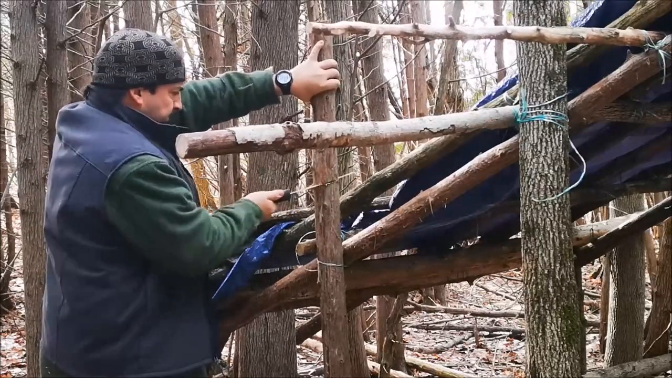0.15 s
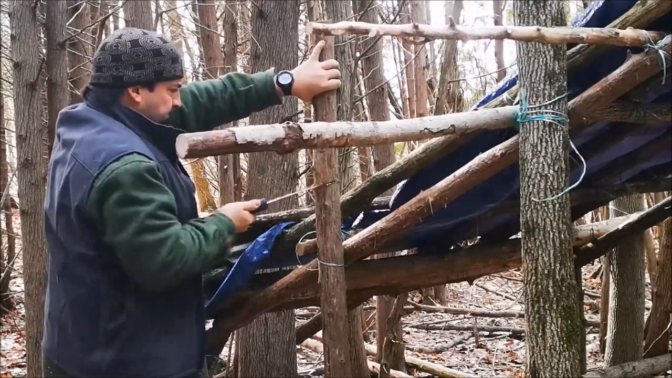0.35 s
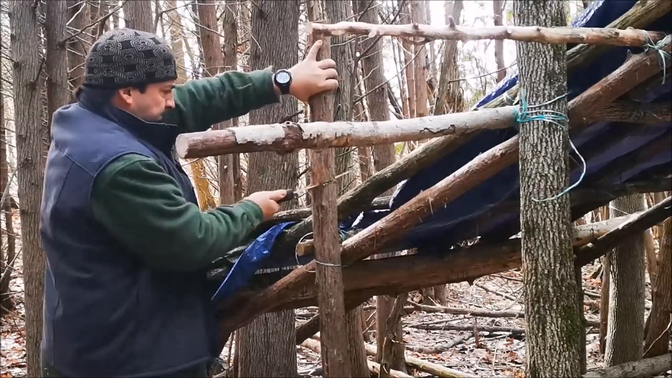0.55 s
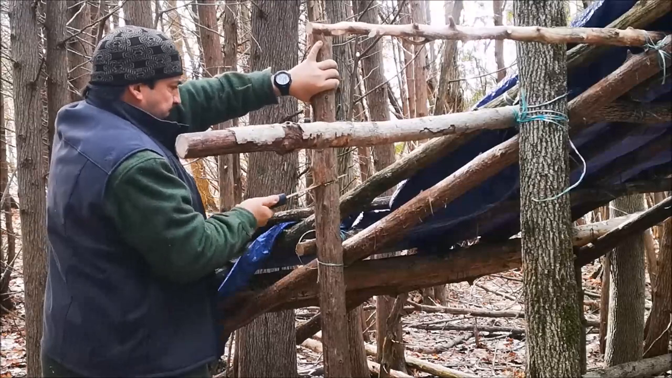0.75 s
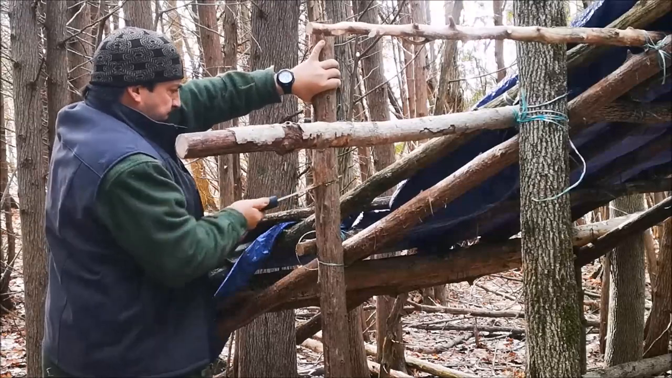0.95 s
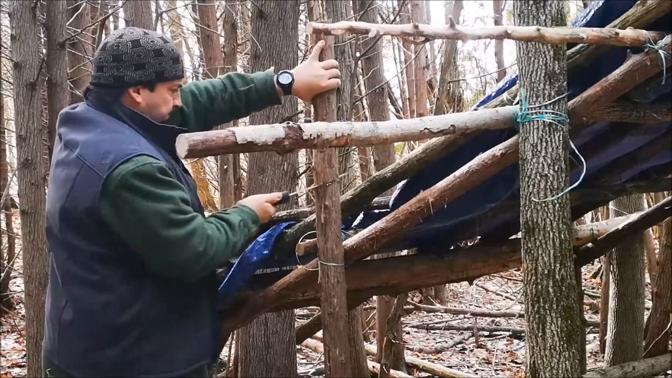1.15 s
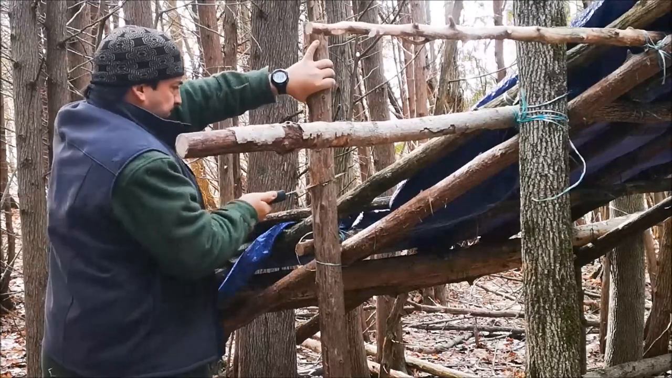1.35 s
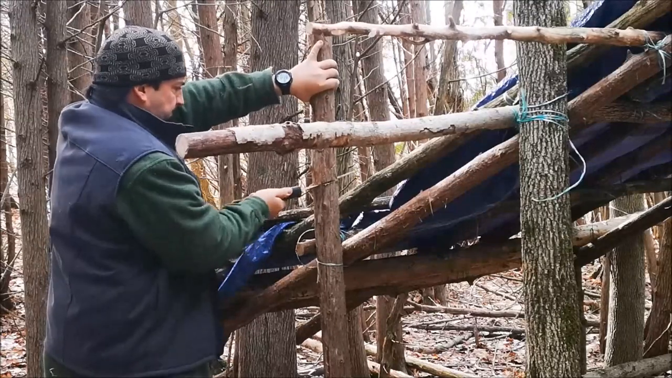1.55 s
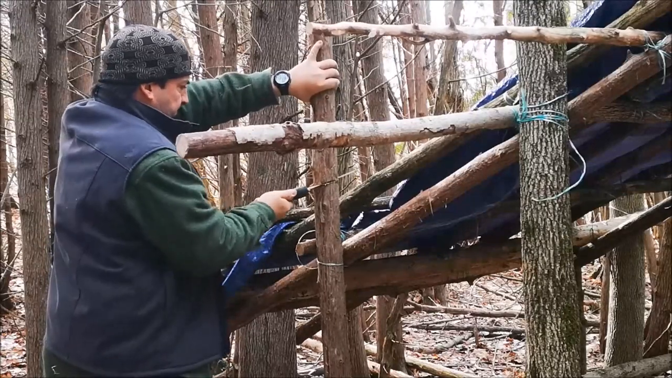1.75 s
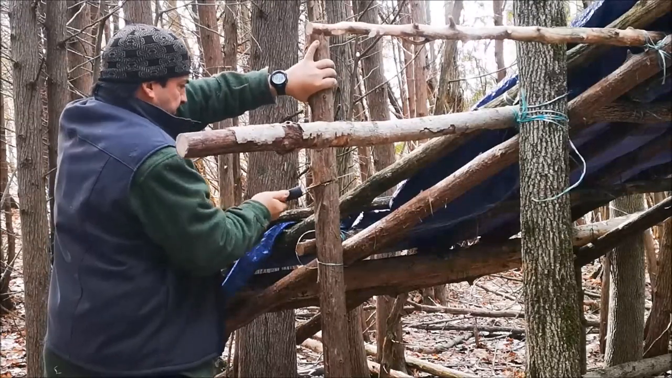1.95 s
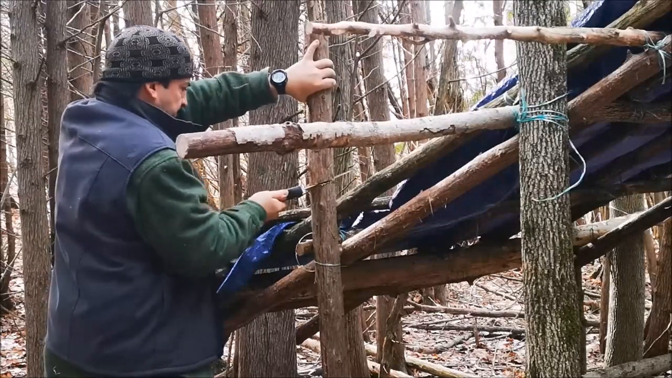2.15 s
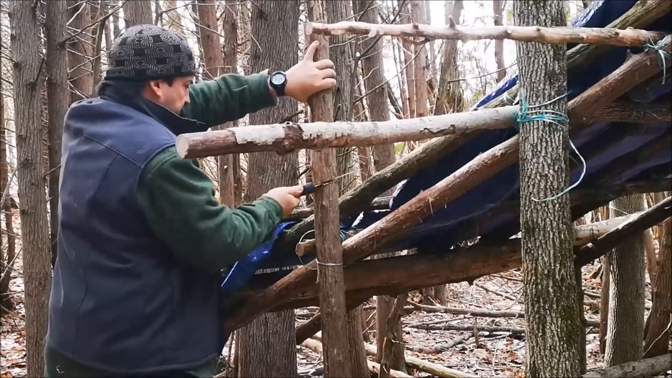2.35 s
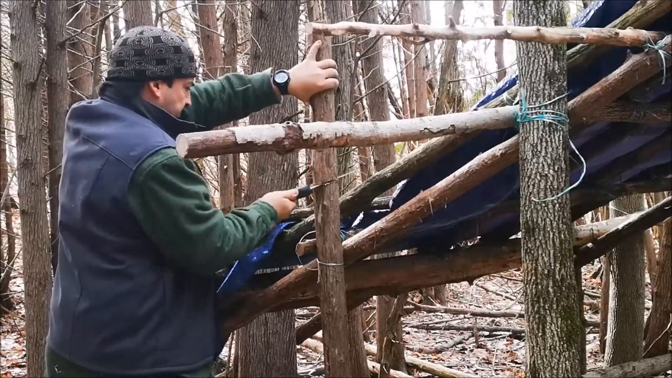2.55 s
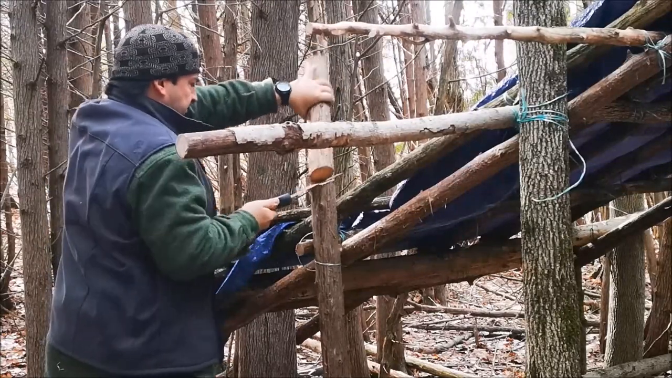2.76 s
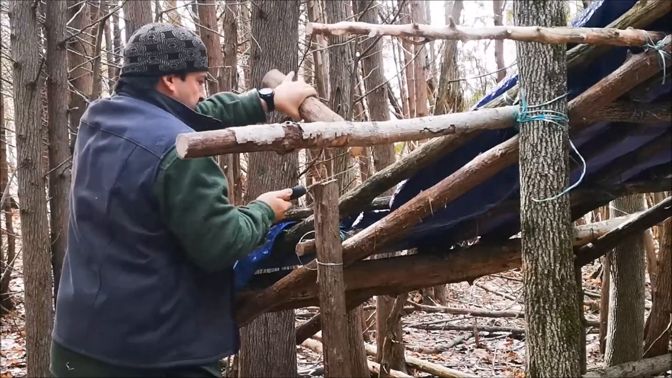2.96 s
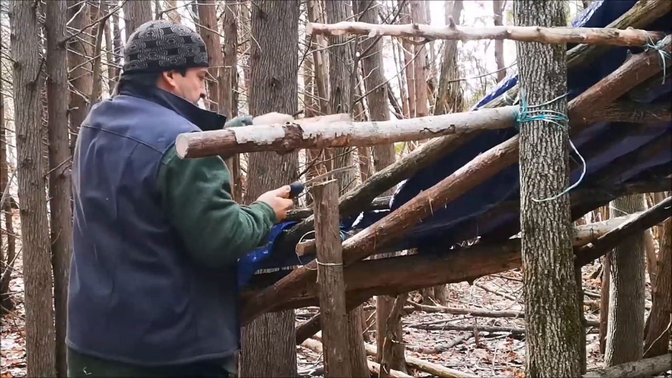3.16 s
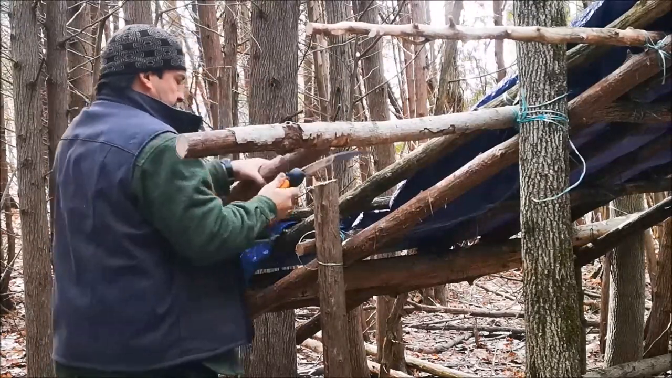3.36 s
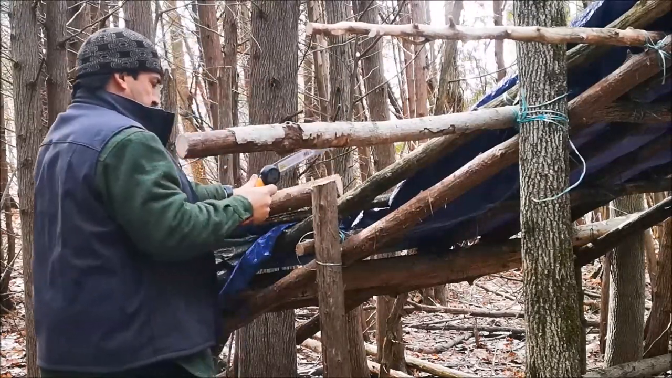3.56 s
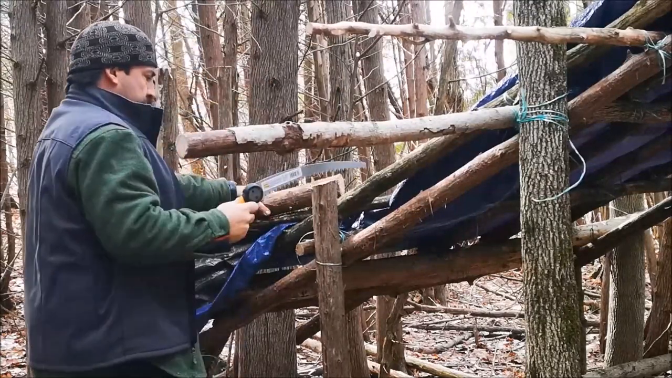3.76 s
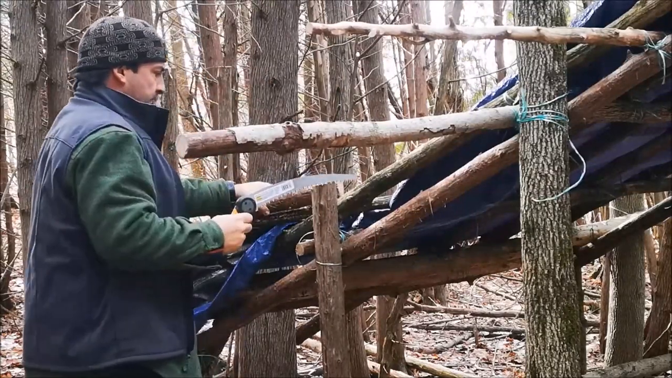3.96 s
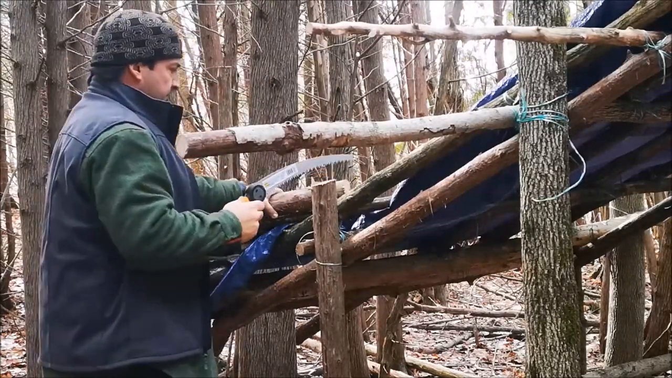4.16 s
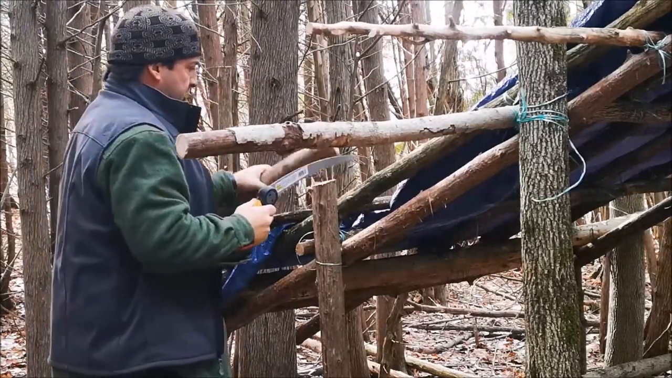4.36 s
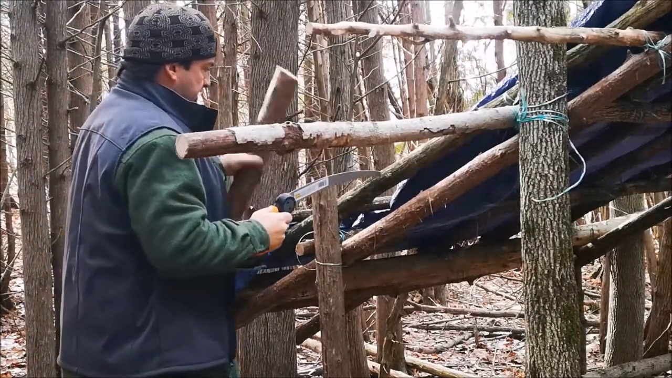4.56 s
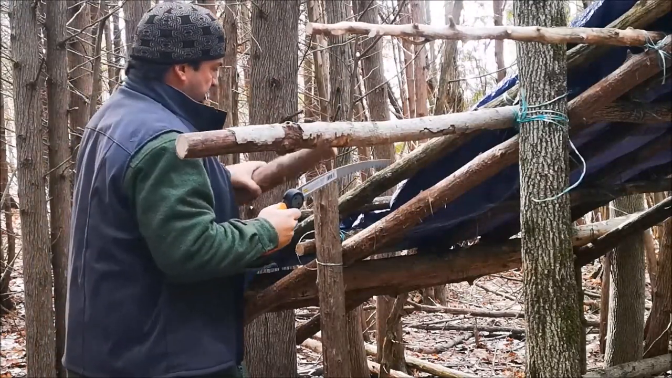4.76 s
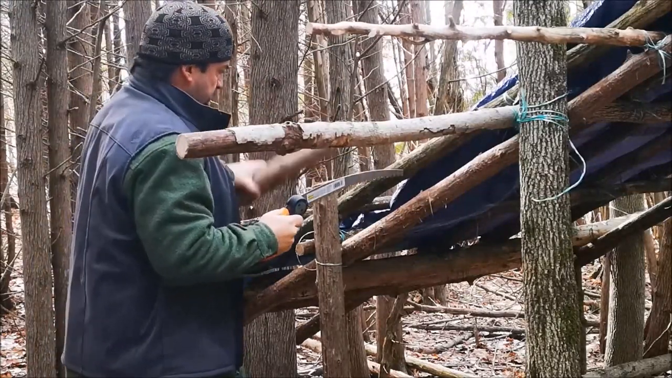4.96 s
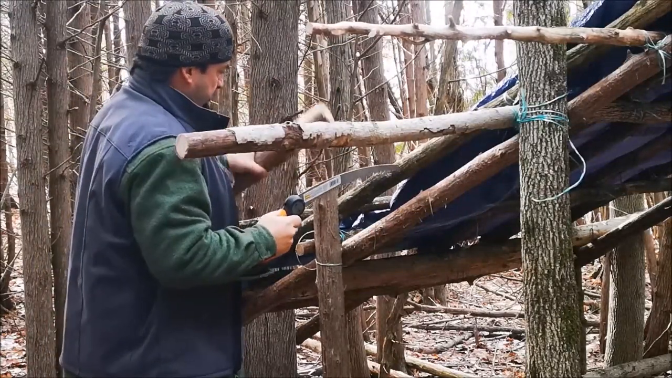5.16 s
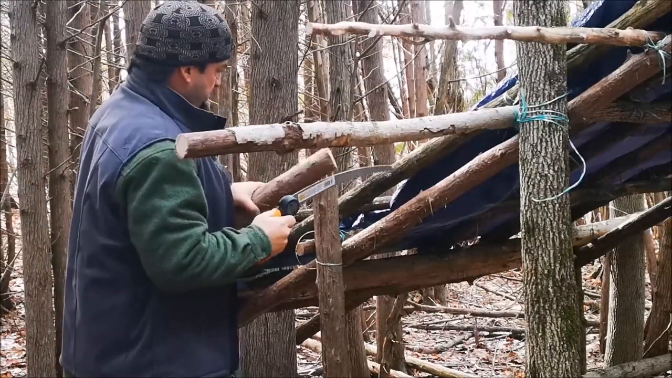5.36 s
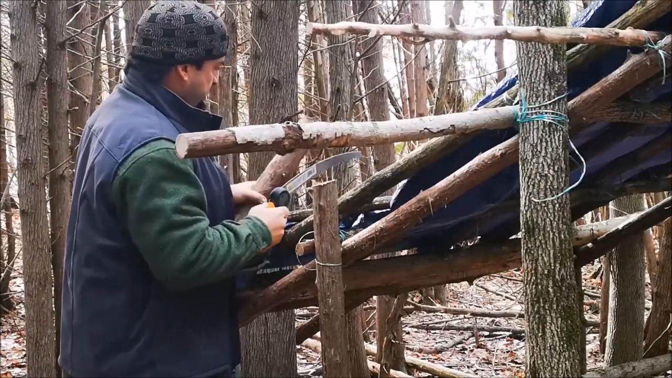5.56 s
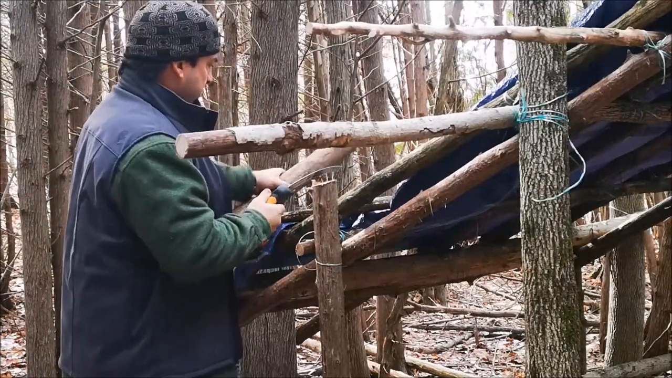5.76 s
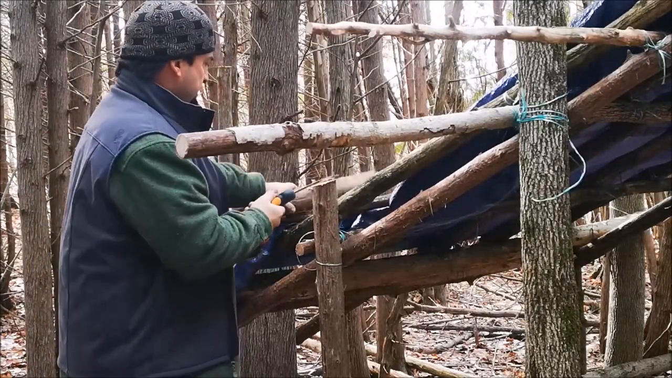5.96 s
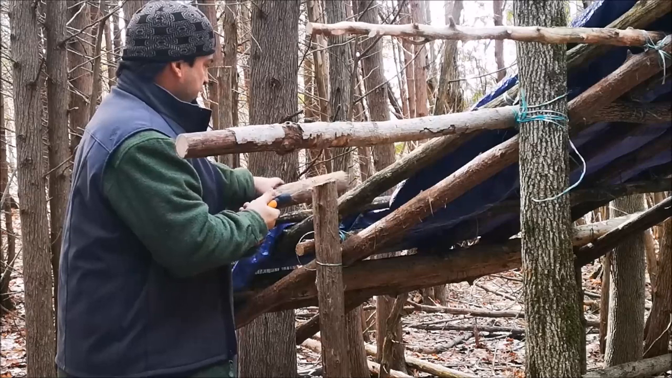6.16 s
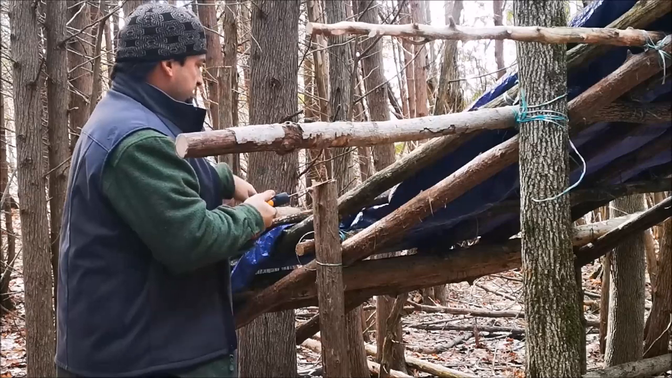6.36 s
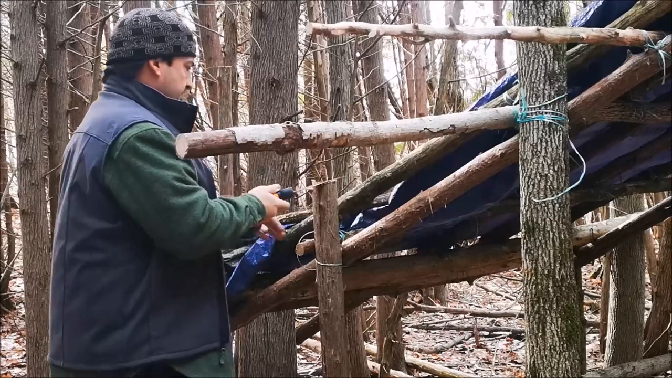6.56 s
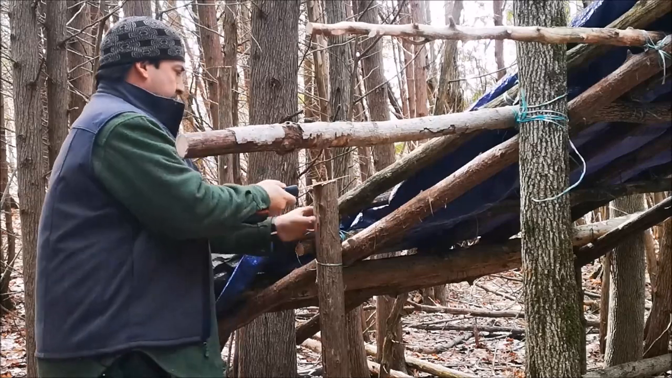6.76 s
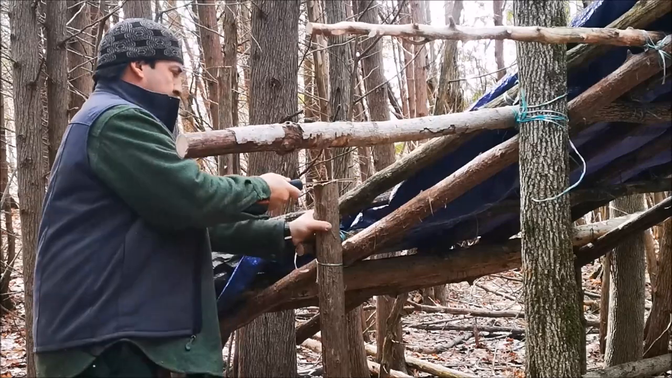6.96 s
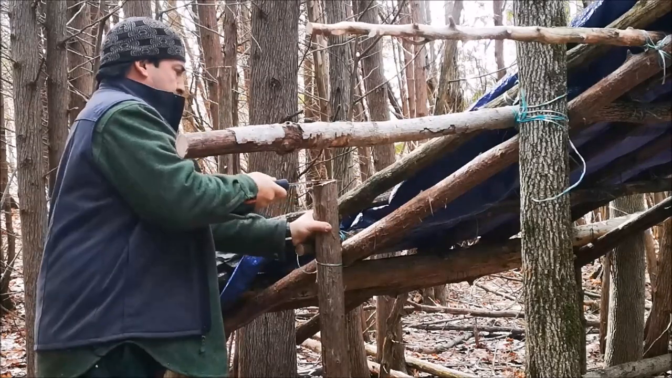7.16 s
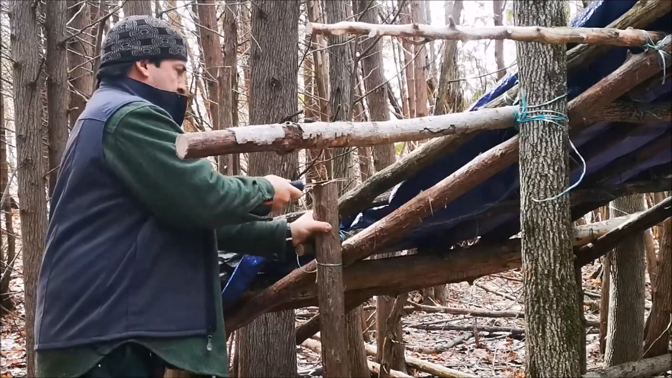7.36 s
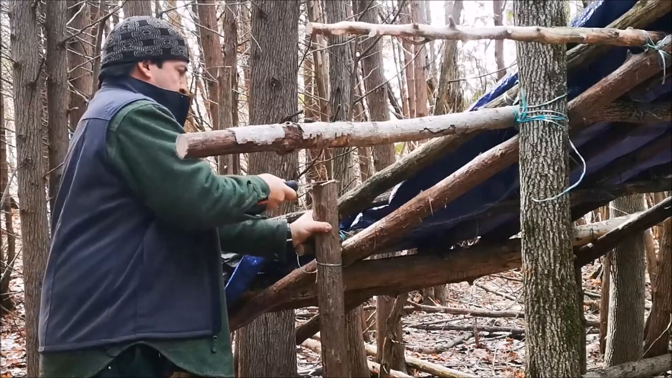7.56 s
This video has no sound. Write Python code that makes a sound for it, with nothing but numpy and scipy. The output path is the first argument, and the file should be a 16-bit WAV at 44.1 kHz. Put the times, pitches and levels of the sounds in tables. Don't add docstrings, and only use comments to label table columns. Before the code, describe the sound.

Close outdoor view in a quiet wood: a hand saw rasps through a green post in uneven strokes, blade and wood ringing. After a pause with bumps and rustles, the offcut snaps off with a loud, bright crack. Sleeves and bark rub, the log knocks dully on a pole and is set down, then a few shorter saw strokes begin. Faint air and far rumble lie beneath.

```python
import sys
import numpy as np
from scipy import signal
from scipy.fft import rfft, irfft, next_fast_len
from scipy.io import wavfile
from scipy.ndimage import uniform_filter1d

SR = 44100
rng = np.random.default_rng(int(sys.argv[2]) if len(sys.argv) > 2 else 0)


def natural_amplitude(level_db):
    exponent = np.asarray(level_db, float) / 20
    return 10 ** exponent


def log_audio(samples):
    frames = np.atleast_2d(samples).T
    limited = np.clip(frames, -1, 1)
    pcm = np.round(limited * 32767).astype(np.int16)
    wavfile.write(sys.argv[1], SR, pcm)


N = 336042
T = np.arange(N) / SR
SLOW_T = np.arange(0, N / SR + .002, .001)
RESUMES_S = 6.9

# full bite t/s, rasp level/dB, rise/s per 20 dB, hold/s, wood ring over rasp/dB
STROKES = [(0.133, -61.5, -1, 0.12, -3), (0.215, -53, 0.15, 0.046, -4), (0.532, -69, 1.5, 0.1, -9),
           (0.64, -55.5, 0.18, 0.024, -3.5), (0.73, -62, 0.1, 0.017, -2.5), (0.794, -45, 0.13, 0.047, -8.5),
           (0.941, -61, 0.1, 0.031, -5), (0.992, -60.5, 0.06, 0.033, -6.5), (1.305, -69, 1.2, .03, -7.5),
           (1.374, -53.5, 0.17, 0.015, -5), (7.043, -56.5, 0.12, 0.044, -14),
           (7.249, -46, 0.2046, 0.067, -10), (7.405, -61, 0.22, 0.067, -10.5), (7.598, -45, 0.03, 0.02, -8)]
# t/s, rasp level/dB, hold/s, wood ring over rasp/dB
PULLS = [
    (-.1, -40.5, 0.14, -6.5),
    (0.3096, -41, 0.12, -6.5),
    (1.082, -43, .11, -7.5),
    (1.424, -49.5, 0.0022, -6),
    (1.483, -59.5, 0.004, 4),
    (1.517, -46, 0.045, -8),
    (1.609, -59.5, 0.093, -6),
    (7.539, -60, 0.036, 0),
]
# t/s, peak level/dB
CATCHES = [(.003, -26.5), (0.3088, -40.5), (0.326, -28), (0.3498, -23.5), (0.7029, -39), (0.7312, -33.5),
           (0.7817, -30.5), (1.0876, -33.5), (1.1072, -31), (1.4307, -40), (1.516, -36), (1.5322, -30.5),
           (1.561, -30.5), (1.613, -34.5), (7.1688, -37), (7.2588, -23.5), (7.198, -46), (7.311, -33),
           (7.336, -41), (7.5365, -39.5), (7.5685, -35), (1.54, -36), (1.677, -45), (7.249, -35),
           (7.277, -40), (7.284, -38), (7.373, -45), (7.433, -45), (7.509, -47.5), (7.549, -43.5),
           (7.572, -37), (7.5745, -35), (7.5775, -37), (7.58, -33), (7.585, -37), (7.593, -34),
           (7.606, -33), (7.612, -33.5), (7.618, -33)]
# f/Hz, width/Hz, level/dB
POST_MODES = [(880, 110, 2.5), (1142, 61, 4.5), (1357, 120, 2), (1712, 185, -2), (2321, 49, 7),
              (2550, 140, 1), (2878, 122, -1)]
STUMP_MODES = [(1234, 72, 2), (1790, 270, -3), (2302, 174, 4.5), (2818, 250, 0.5), (3470, 490, -1),
               (4400, 800, -5)]
BLADE_MODES = [(3705, 290, -2.5), (4980, 540, -8), (5823, 500, 5), (6490, 550, -3)]
POLE_MODES = [(127, 40, 1), (295.5, 71, -1.5), (421, 45, -6), (618, 110, -9.5)]
KNOCKED_MODES = [(487, 59, -9.5), (857, 94, 1.5), (1340, 130, -8), (1779, 86, 5.5), (2320, 110, 1.5),
                 (2886, 76, 1.5), (3506, 120, 0), (4460, 110, -5.5), (5750, 100, -0.5)]
# t/s, peak level/dB, woody share/dB
CRACKS = [(1.482, -46.5, 0), (1.497, -50, 2), (1.516, -46, 2), (1.5325, -46, 3), (1.613, -45.5, 2.5),
          (2.0492, -30.5, -16), (2.15, -48.5, 1.5), (2.177, -40.5, -5), (2.3058, -46.5, 1.5),
          (2.4978, -36, -13), (2.557, -43.5, -28.5), (2.766, -34.5, -24.5), (2.7796, -36, -14),
          (2.809, -10, -17), (2.8285, -26, -30), (3.0487, -42, -6.5), (3.255, -52, 0), (4.2018, -47, -19),
          (4.2883, -46.5, -5), (4.3033, -44.5, -9), (4.4734, -42, -11), (4.805, -36, -1),
          (4.9556, -55, -29), (5.1503, -29.5, -7), (5.4999, -31, -10.5), (5.6047, -47.5, -29),
          (6.1595, -45.5, -1), (6.5028, -51.5, 10), (6.846, -52, -18), (4.0713, -48, -20),
          (4.2184, -44.5, -25), (4.3457, -54.5, -16), (4.3856, -50.5, -7), (4.408, -49, -20),
          (4.421, -46, -15), (4.45, -49.5, -3.5), (6.2434, -58, -8), (6.3028, -50, -3.5), (6.417, -52, -16),
          (6.4659, -50, -15), (6.4873, -48.5, -23)]
# t/s, hiss level/dB, fall/s per 20 dB, scrape over hiss/dB
JOLTS = [(2.048, -55, 0.11, -3.5), (2.144, -56.5, 0.08, -1.5), (2.302, -53.5, -0.08, -9),
         (2.499, -56.5, -0.08, 2.5), (2.557, -47.5, -0.18, -20), (2.765, -51.5, 0.31, -9),
         (2.81, -31.5, 0.0412, -5.5), (2.831, -43, 0.1621, -7.5), (3.256, -66.5, 0.32, -0.5),
         (4.807, -54.5, 0.0541, -4), (4.821, -62.5, 0.17, -11), (4.96, -71.5, 0.08, -17),
         (5.154, -46, -0.0526, -3), (5.17, -61, 0.1872, -5.5), (5.5, -50, 0.07, -9.5),
         (5.554, -56, -0.1459, 0), (5.605, -68, 0.12, -20.5), (6.072, -71.5, 0.3, 0.5),
         (6.158, -74.5, 0.5, 2.5), (6.498, -61.5, 0.26, -3)]
# loudest t/s, hiss level/dB, rise and fall/s per 20 dB, scrape over hiss/dB
SWISHES = [(1.94, -61.5, 0.14, 0.073, -2.5), (2.48, -65.5, 0.025, 0.25, -4.5), (2.74, -73, 0.083, .05, -11),
           (3.07, -58.5, 0.39, 0.076, -3), (3.405, -47, 0.079, 0.063, -8.5), (3.74, -57, 0.073, 0.37, -9.5),
           (3.83, -60.5, 0.093, 0.072, -8), (3.96, -68.5, 0.1, 0.026, -18.5),
           (4.125, -48.5, 0.068, 0.072, -5.5), (4.23, -59.5, 0.078, 0.062, -10),
           (4.3, -59.5, 0.084, 0.043, 1), (4.425, -58.5, 0.13, 0.085, -7), (4.65, -79.5, 0.56, 0.34, -9.5),
           (6.32, -64.5, 0.18, 0.26, -9), (6.47, -66, 0.15, 0.25, -2), (6.715, -50, 0.058, 0.073, 2),
           (6.848, -59.5, 0.03, 0.047, -1.5), (6.99, -72, 0.1, 0.24, -6), (7.135, -64, 0.11, 0.13, 1),
           (2.36, -64, 0.33, 0.017, -3.5), (4.35, -64.5, 0.05, 0.064, -6),
           (6.58, -73.5, 0.068, 0.052, -4.5)]
# loudest t/s, level/dB, rise and fall/s per 20 dB
DRAGS = [
    (2.31, -64, 0.0072, 0.079),
    (4.11, -60, 0.038, 0.072),
    (4.29, -66.5, 0.052, 0.064),
    (6.165, -65.5, 0.026, 0.05),
    (6.51, -52, 0.028, 0.14),
    (6.73, -46, 0.06, 0.058),
    (7.12, -73.5, 0.34, 0.16),
    (2.155, -47.5, 0.0082, 0.052),
    (7.6, -58, 0.063, 0.052),
]
# t/s, peak level/dB, f/Hz
BUMPS = [(.106, -43, 280), (1.174, -54, 290), (1.593, -44, 280), (1.874, -36.5, 300), (2.1464, -37.5, 310),
         (2.462, -43.5, 290), (2.599, -54.5, 250), (2.7649, -38, 300), (2.791, -50, 290), (2.987, -38, 300),
         (3.739, -57.5, 200), (6.723, -47.5, 280)]
# t/s, peak level/dB, f/Hz
KNOCKS = [
    (4.803, -37, 160),
    (5.1493, -30, 190.6),
    (5.2, -43, 110),
    (5.496, -32, 194),
    (5.548, -45.5, 100),
]
# t60/s, attack/s, pitch sag/s
BUMP_SHAPE = (0.024, 0.0028, .006)
KNOCK_SHAPE = (0.034, 0.0018, 0.01)
# after-shake/dB, rattle/dB, rattle t60/s, ground tremor/dB
BUMP_AFTER = (-10, -7.5, 0.28, -16)
KNOCK_AFTER = (-14, -18, 0.09, -15.5)
# t/s, peak level/dB
TAP = [
    (6.5, -29),
]
# f/Hz, level/dB, t60/s
LOG_MODES = [(266, -5, 0.1), (432, -1, 0.11), (851, -14, 0.08), (1058, 3, 0.055), (2089, -23, 0.1)]
# t/s, level/dB
RUMBLE = [(0.0, -50.5), (0.7, -54), (0.91, -56), (1.97, -63.5), (2.63, -64.5), (2.99, -54.5), (3.16, -65),
          (3.42, -59.5), (3.56, -61), (4.11, -62.5), (4.26, -55.5), (5.01, -65), (5.43, -62.5), (6.05, -63),
          (7.21, -58), (7.62, -55.5)]
# f/Hz, level/dB per Hz
RUMBLE_TONE = [(15, -10.5), (30, 0), (55, -1.5), (78, 2.5), (100, -4), (130, -12), (170, -23), (230, -18),
               (300, -27), (450, -35.5), (1000, -95)]
AIR_TONE = [(300, -3), (1000, 4.5), (2000, 1.5), (3200, -6), (6000, -16), (9000, -19.5), (16000, -13)]
# f/Hz, level/dB
LEFT_PORT = [(200, 1), (4000, -2.5), (6200, 8.5), (6800, 9), (7300, 17), (7700, 13.5), (8200, -2),
             (10500, -6), (11400, 0.5), (12300, -15), (13000, -3.5), (15000, -8)]
RIGHT_PORT = [(250, 1), (450, -5.5), (680, -8.5), (1200, -8.5), (3000, -6.5), (5000, -3.5), (6500, -18.5),
              (7300, -26.5), (8200, -0.5), (9300, 3.5), (10500, 4), (11600, -8.5), (13000, -14.5),
              (15000, -12)]
# f/Hz, phase/rad
LEFT_LEAD = [(0, 0), (60, .1), (150, .3), (400, .9), (690, 3.2), (1400, 6.5), (3600, 6.7), (5400, 7.9),
             (6500, 9.5), (7000, 12.5), (9000, 12.3), (10300, 14.3), (13100, 12.8), (15000, 14)]

TEETH_PER_S = 250
BITE_S, SHORTEST_RISE_S, STROKE_FALL_S = .003, .04, 0.045
WOOD_LATE_DB, POLE_LATE_DB, BUILD_S = -9, -13.5, 0.097
POLE_DB, STUMP_POLE_DB = -3.5, -1.5
POLE_PER_DB, FIRM_DB = 0.45, -47.5
JOLT_RISE_S, SHUFFLE_DB = 0.0043, -13.5
SCUFF_DB, KNOCK_SCUFF_DB, SCUFF_FALL_S = -9.5, -16, 0.033
CRACK_S, CATCH_S, TICK_T60_S = .0027, .0013, .045
CATCH_WOOD_DB = -17
TREES_T60_S, TREES_DB = 0.09, -10.5
TREMOR_RISE_S, TREMOR_FALL_S = 0.023, 0.17
SAW_TREMOR_DB, AIR_DB = -2, -72.5


def saw(rasp, ring_gain, drone):
    rate = TEETH_PER_S * (1 + .35 * walk(150)).clip(.2)
    count = np.cumsum(rate / SR).astype(int)
    bites = np.diff(count, prepend=0) * natural_amplitude(3.4 * noise())
    tear = level(puffs(bites, 0.0027)) + 0.96
    push = tear * noise() + level(bites, -3.5)
    post, stump, poles = (level(wander(body(push, modes, slide_db=3.0)))
                          for modes in (POST_MODES, STUMP_MODES, POLE_MODES))
    wood = np.where(T < RESUMES_S, post, stump)
    fibres = tear * noise()
    blade = body(fibres, BLADE_MODES, slide_db=3.0) * np.where(T < RESUMES_S, 1, natural_amplitude(-7))
    ports = []
    for own in (0, 1):
        hiss = band(band(fibres + own * tear * noise(), 5200, 18000), 4600, 17000)
        cut = rasp * level(hiss + blade, 1.8)
        ports.append(cut + ring_gain * natural_amplitude(7.0) * wood + drone * natural_amplitude(2.5) * poles)
    return np.array(ports)


def strokes():
    rows = [(s, db, max(rise, SHORTEST_RISE_S), *rest) for s, db, rise, *rest in STROKES]
    rows += [(s, db, BITE_S, *rest) for s, db, *rest in PULLS]
    rasp, wood, pole = [], [], []
    for s, db, rise, hold, wood_db in rows:
        early = (1 - (SLOW_T - s + rise) / BUILD_S).clip(0, 1)
        stroke = swell(s, db, rise, hold, STROKE_FALL_S)
        pole_db = wood_db + POLE_DB + POLE_PER_DB * (db - FIRM_DB) + STUMP_POLE_DB * (s > RESUMES_S)
        rasp.append(stroke)
        wood.append(stroke * natural_amplitude(wood_db + WOOD_LATE_DB * early))
        pole.append(stroke * natural_amplitude(pole_db + POLE_LATE_DB * early))
    return blend(rasp), blend(wood), blend(pole)


def ticks():
    bright, thin, woody = np.zeros(N), np.zeros(N), np.zeros(N)
    t = T[:SR // 4]
    tail = natural_amplitude(-60 * t / TICK_T60_S)
    for s, db, wood_db in CRACKS:
        burst = rng.standard_normal(len(t)) * (np.exp(-t / CRACK_S) + .4 * tail)
        add(bright, s, natural_amplitude(db - 6.5) * burst)
        add(woody, s, natural_amplitude(db + wood_db) * burst)
    for s, db in CATCHES:
        burst = rng.standard_normal(len(t)) * (np.exp(-t / CATCH_S) + 0.18 * tail)
        add(thin, s, natural_amplitude(db - 4.0) * burst)
        add(woody, s, natural_amplitude(db + CATCH_WOOD_DB) * burst)
    crack = band(bright, 1800, 20000)
    crack += natural_amplitude(-12) * band(bright, 2300, 6200) + natural_amplitude(3.5) * band(bright, 10500, 15000)
    wood = natural_amplitude(5.0) * body(woody, KNOCKED_MODES) + natural_amplitude(-1.5) * band(woody, 690, 5300)
    return crack + band(thin, 2600, 21000) + wood


def thuds():
    out, t = np.zeros(N), T[:SR // 3]
    for s, db, hz, t60, attack, sag, shake_db, rattle_db, rattle_t60, _ in blows():
        turns = hz * (.4 * t + .6 * sag * (1 - np.exp(-t / sag)))
        blow = -np.sin(2 * np.pi * turns) * natural_amplitude(7.0 - 60 * t / t60) * (1 - np.exp(-t / attack))
        rattle = level(band(rng.standard_normal(len(t)), 180, 460))
        rattle *= natural_amplitude(rattle_db - 60 * t / rattle_t60) * (1 - np.exp(-t / 0.0049))
        shake = level(band(rng.standard_normal(len(t)), 60, 130))
        shake *= natural_amplitude(shake_db - 60 * t / .28) * (1 - np.exp(-t / 0.013))
        add(out, s + 0.0034, natural_amplitude(db) * (blow + rattle + shake))
    for s, db in TAP:
        modes = sum(natural_amplitude(db - 4.5 + g - 60 * t / t60) * np.sin(2 * np.pi * hz * t)
                    for hz, g, t60 in LOG_MODES)
        add(out, s, modes * (1 - np.exp(-t / 0.0012)))
    return out


def blows():
    bumps = [(*row, *BUMP_SHAPE, *BUMP_AFTER) for row in BUMPS]
    return bumps + [(*row, *KNOCK_SHAPE, *KNOCK_AFTER) for row in KNOCKS]


def rubbing():
    hiss, scrape, shuffle = rubs()
    slips = (rng.random(N) < 900 / SR) * natural_amplitude(3.5 * rng.exponential(size=N))
    grain = (level(puffs(slips, 0.0023)) + 0.62) * natural_amplitude(1.3 * walk(60))
    common = noise()
    ports = []
    for own in (0, 1):
        x = grain * (common + own * noise())
        mix = hiss * level(band(x, 3300, 14000), 3.58)
        mix += scrape * level(band(x, 1500, 3600), 5.47)
        mix += shuffle * level(band(x, 200, 800), 2.9)
        ports.append(mix)
    return np.array(ports)


def rubs():
    rows = SWISHES + [(s, db, JOLT_RISE_S, fall, share) for s, db, fall, share in JOLTS]
    hiss = [(swell(s, db, rise, 0, fall), share) for s, db, rise, fall, share in rows]
    low = DRAGS + [(s + 0.0038, db + SCUFF_DB, JOLT_RISE_S, SCUFF_FALL_S) for s, db, _ in BUMPS]
    low += [(s + 0.0065, db + KNOCK_SCUFF_DB, JOLT_RISE_S, SCUFF_FALL_S) for s, db, _ in KNOCKS]
    shuffle = [g * natural_amplitude(SHUFFLE_DB + share) for g, share in hiss]
    shuffle += [swell(s, db, rise, 0, fall) for s, db, rise, fall in low]
    return blend(g for g, _ in hiss), blend(g * natural_amplitude(share) for g, share in hiss), blend(shuffle)


def trees(x):
    t = T[:SR // 2]
    tail = rng.standard_normal((2, len(t))) * natural_amplitude(-60 * t / TREES_T60_S) * (t > .005)
    tail = tail / np.sqrt(np.sum(tail ** 2, axis=1, keepdims=True))
    return natural_amplitude(TREES_DB) * signal.oaconvolve(x[None], tail, axes=1)[:, :N]


def wood_floor(drone):
    far = natural_amplitude(np.interp(SLOW_T, *np.transpose(RUMBLE)))
    tremors = [swell(s + 0.0085, db + tremor_db, TREMOR_RISE_S, 0.023, TREMOR_FALL_S)
               for s, db, *_, tremor_db in blows()]
    gain = np.hypot(blend([far] + tremors), natural_amplitude(SAW_TREMOR_DB) * drone)
    both = noise()
    rumble = np.array([level(colour(both + 0.12 * noise(), RUMBLE_TONE)) for _ in "LR"])
    rumble = rumble * gain * natural_amplitude(2.1 * walk(6.7))
    air = [level(band(colour(noise(), AIR_TONE), 250, 18000), AIR_DB + g) for g in (0, 5.0)]
    return rumble + np.array(air)


def level(x, db=0):
    return x * natural_amplitude(db) / np.sqrt(np.mean(x ** 2))


def noise():
    return rng.standard_normal(N)


def walk(rate_hz):
    k = int(SR / rate_hz)
    held = np.repeat(rng.standard_normal(N // k + 1), k)
    return level(uniform_filter1d(held, k)[:N])


def puffs(starts, decay_s):
    return signal.lfilter([1], [1, -np.exp(-1 / (decay_s * SR))], starts)


def add(out, s, sound):
    i = int(s * SR)
    out[i:i + len(sound)] += sound[:N - i]


def swell(s, db, rise_s, hold_s, fall_s):
    before = (s - SLOW_T) / max(rise_s, .002)
    after = (SLOW_T - s - hold_s) / max(fall_s, .01)
    return natural_amplitude(db - 20 * np.maximum(before, after).clip(0))


def blend(gains):
    return np.interp(T, SLOW_T, np.sqrt(sum(g ** 2 for g in gains)))


def ring(x, hz, width_hz):
    return signal.lfilter(*signal.iirpeak(hz, hz / width_hz, fs=SR), x)


def body(x, modes, slide_db=0):
    return sum(natural_amplitude(db + slide_db * walk(14)) * ring(ring(x, hz, width), hz, 2 * width)
               for hz, width, db in modes)


def wander(x):
    n = np.arange(N)
    return np.interp(n + np.cumsum(.01 * walk(12)), n, x)


def band(x, lo_hz, hi_hz):
    return signal.sosfilt(signal.butter(2, [lo_hz, hi_hz], "bandpass", fs=SR, output="sos"), x)


def on_hz(table, hz):
    f, v = np.transpose(sorted(table))
    return np.interp(np.log(hz + 1), np.log(f + 1), v)


def colour(x, table):
    cep = irfft(np.log(natural_amplitude(on_hz(table, np.fft.rfftfreq(4096, 1 / SR)))))
    cep[1:2048] *= 2
    cep[2049:] = 0
    return signal.oaconvolve(x, irfft(np.exp(rfft(cep))))[:N]


def scene():
    hits, gains = ticks() + thuds(), strokes()
    near = saw(*gains) + rubbing() + hits
    return near + trees(band(near[0], 840, 12000)) + wood_floor(gains[2])


def roll_off(x):
    return signal.sosfilt(signal.butter(12, 16530, fs=SR, output="sos"), x)


def record(dry):
    left, right = (colour(x, LEFT_PORT) for x in dry)
    size = next_fast_len(N + 4096)
    hz = np.fft.rfftfreq(size, 1 / SR)
    shade = natural_amplitude(on_hz(RIGHT_PORT, hz)) * np.exp(-1j * on_hz(LEFT_LEAD, hz))
    right = irfft(rfft(right, size) * shade, size)[:N]
    return roll_off(np.array([left, right]))


dry = scene()
out = record(dry)
log_audio(out)
```